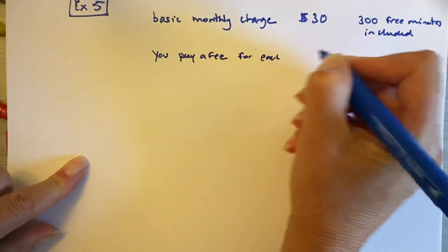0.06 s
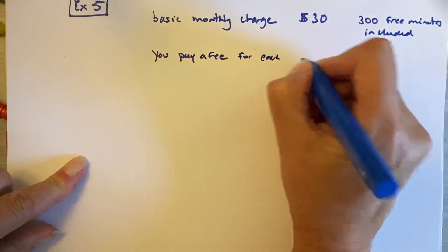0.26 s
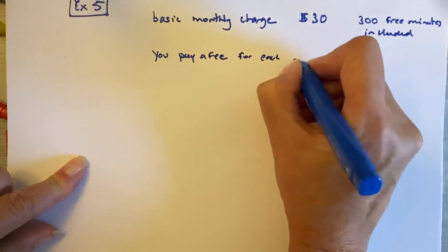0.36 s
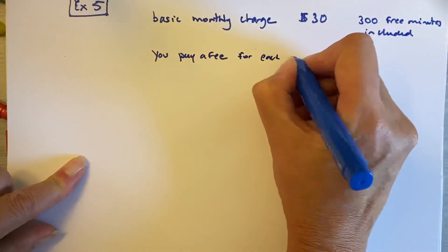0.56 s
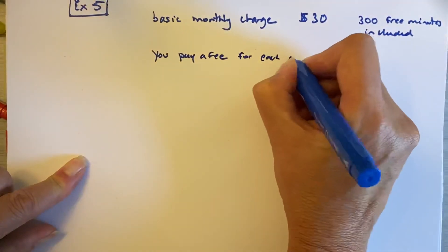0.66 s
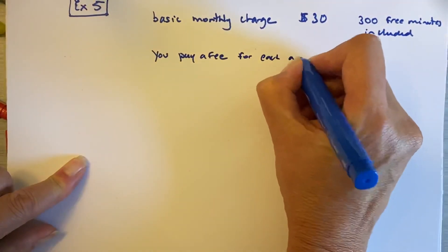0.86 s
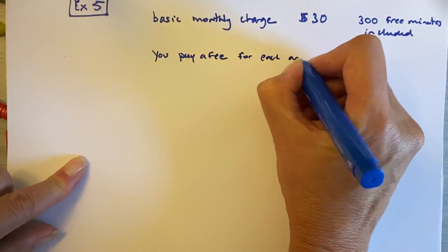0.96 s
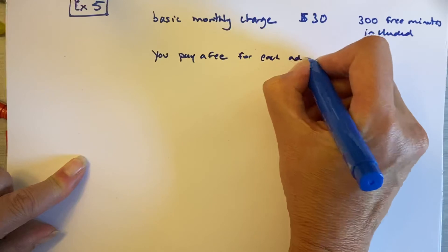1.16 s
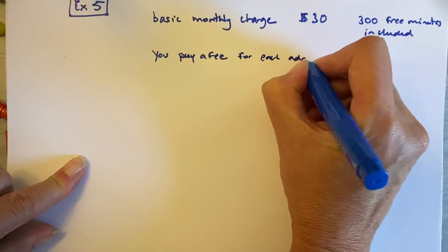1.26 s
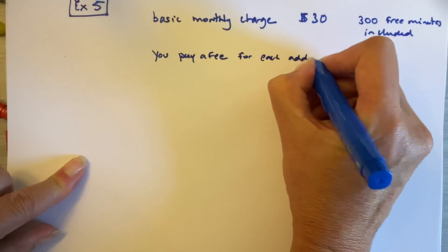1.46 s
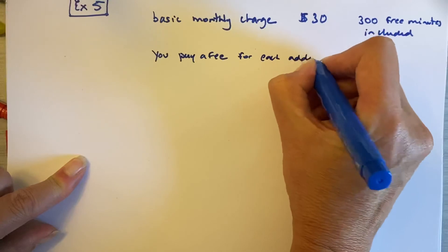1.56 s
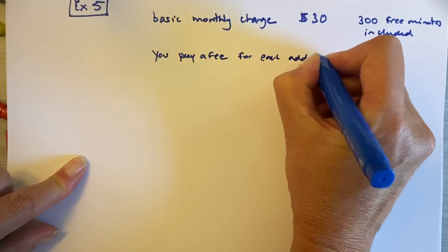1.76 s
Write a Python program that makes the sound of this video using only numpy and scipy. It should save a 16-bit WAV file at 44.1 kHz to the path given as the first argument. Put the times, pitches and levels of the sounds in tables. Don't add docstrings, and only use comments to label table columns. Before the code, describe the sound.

A felt-tip marker writes on paper on a wooden desk: hollow hand thumps and a brief slide come first, then quick dry scratches with soft taps, close microphone, quiet room with low rumble.

```python
import sys
import numpy as np
from scipy import signal
from scipy.fft import rfft, irfft
from scipy.io import wavfile
from scipy.ndimage import uniform_filter1d

SR = 44100
rng = np.random.default_rng(int(sys.argv[2]) if len(sys.argv) > 2 else 0)


def voltage_ratio(decibels):
    exponent = np.asarray(decibels, float) / 20
    return 10 ** exponent


def wav_out(sig):
    wavfile.write(sys.argv[1], SR, np.round(np.clip(np.atleast_2d(sig).T, -1, 1) * 32767).astype(np.int16))


N = 79380
T = np.arange(N) / SR
F = np.arange(N // 2 + 1) * SR / N

# (frequency [Hz], density [dB])
ROOM_SPECTRUM = [(15, -11.5), (25, -16), (50, 3), (114, 6), (1100, -29), (1410, -30.5), (2190, -34.5),
                 (2340, -24.5), (2510, -35.5), (6000, -55.5), (7800, -38), (13200, -120)]
# (frequency [Hz], lead [rad])
PORT_LEAD = [(0, 0), (160, -.2), (1000, -.36), (1400, -.36), (2500, .56), (3300, .17), (4300, .8),
             (5000, .13), (6950, 3.0), (7350, 3.14), (8000, 3.45), (9750, 6.03), (11500, 6.6), (12500, 9.3),
             (13700, 9.5), (14900, 11.8), (15600, 12.4)]
# (start [s], length [s], level [dB])
SLIDES = [
    (.19, 0.058, -67),
    (.243, 0.063, -67.5),
    (.322, 0.06, -68.5),
    (.375, 0.036, -78),
]
# (frequency [Hz], width [Hz], level [dB])
SKIN = [(467, 173, 20), (1380, 300, 3), (2130, 110, 3), (2470, 370, -0.5), (3830, 1000, -7.5),
        (6200, 200, 7.5), (8670, 800, -52)]
# (time [s], level [dB], push [ms], crack [dB])
THUMPS = [
    (.062, -39, 5.9, -66),
    (.1925, -62.5, 1.6, -2),
    (.213, -28, 6.1, -55),
    (.2465, -41.5, 2.67, -18.5),
    (.282, -29, 7.5, -47),
    (.3195, -40, 0.7, -15.5),
    (.3252, -27.5, 2.16, -29.5),
    (.425, -38, 2.52, -52),
    (.622, -35, 7.1, -52),
]
# (frequency [Hz], level [dB], t60 [s])
DESK_FREE = [(118.4, -17, 1), (163.1, 0.5, 0.37), (245.9, 5, 0.23), (329, -1, 0.065), (407, 2, 0.026),
             (491, -4, 0.061), (660, -4.5, 0.023), (675, -11, 0.21), (733, -9.5, 0.066), (864, -31, 0.04),
             (1027, -18, 0.24), (1250, -35.5, .12), (1666, -19, 0.12), (2150, -30, .12)]
# (time [s], level [dB], push [ms], crack [dB])
TAPS = [(.522, -68.5, 1, -2), (.592, -47.5, 1.38, -35), (.849, -42.5, 5.7, -13), (.878, -83, 0.56, -35),
        (1.000, -43, 2.38, -30), (1.058, -39, 5.3, -24), (1.108, -75, 6.6, -36), (1.252, -52, 3.7, -8),
        (1.435, -42.5, 2.37, -42), (1.561, -66, 1.1, -4), (1.568, -47, 2.38, -28), (1.743, -83, 1.8, 5),
        (1.765, -70.5, 5.8, 2)]
# (frequency [Hz], level [dB], t60 [s])
DESK_PRESSED = [(57.3, -20, 0.37), (111, -13.5, 0.13), (202, -14, 0.068), (267, -7, 0.054),
                (321.4, 1, 0.059), (412.5, -20, 0.17), (491, -26, 0.24)]
# (frequency [Hz], density [dB])
CRACK_SPECTRUM = [(600, -12), (2000, 1), (4500, -12), (6200, 2.5), (9000, -11), (15500, -52)]
# (start [s], length [s], level [dB], pitch [Hz], glide [Hz/s])
CHATTER = [(-.02, 0.055, -63.5, 321.8, 1), (0.234, 0.015, -44.5, 407, 16), (0.421, 0.022, -50.5, 332.4, 1),
           (0.423, 0.027, -60, 438, 6), (.43, .04, -54, 249.3, 3), (0.56, .03, -53.5, 309.4, -3),
           (.583, 0.018, -49, 407.5, 4), (.585, 0.022, -61, 521, -3), (.625, 0.029, -61.5, 510.3, -10),
           (1.147, 0.029, -62.5, 330, 0), (0.603, 0.15, -57, 334.3, -300), (0.758, 0.059, -52.5, 309, 8),
           (0.858, 0.05, -52, 315.5, -100), (0.909, 0.035, -50.5, 317.8, -250),
           (0.943, 0.051, -64, 422, -4), (0.986, 0.027, -54, 297.7, 250), (.715, 0.038, -55.5, 269, -5),
           (1.056, 0.084, -53, 306.1, 252), (1.094, 0.065, -59.5, 431, 12), (1.187, 0.058, -54.5, 316, 197),
           (1.245, 0.052, -53, 305.3, 253), (1.29, 0.034, -60.5, 260.4, 4), (1.253, 0.045, -61, 424, 4),
           (1.373, 0.11, -66, 313, -8), (1.429, 0.03, -44.5, 314.6, 0), (1.438, 0.052, -59, 126.3, -6),
           (1.475, .025, -62.5, 295, 0), (1.565, .022, -55.5, 314, -16), (1.575, 0.026, -56.5, 123, 0),
           (1.784, 0.023, -59.5, 291, 0)]
# (start [s], length [s], scratch [dB], barrel re scratch [dB], desk hum [dB])
STROKES = [(-.02, 0.11, -67, -19.5, -62.5), (.133, 0.053, -65.5, -33, -64), (.189, 0.022, -62, -19, -43),
           (.519, 0.06, -67, -4, -61), (.568, 0.05, -63, -17, -53), (.624, .02, -75.5, -1, -66),
           (.642, 0.038, -57.5, -19, -54), (.703, 0.016, -68, -5, -66), (.714, 0.083, -62, -8, -64),
           (.795, 0.062, -63, -9.5, -61), (.844, 0.075, -61, -13, -59.5), (.922, 0.014, -67.5, 2, -62),
           (.932, 0.042, -57.5, -15, -58.5), (.975, .035, -66.5, -5.5, -62.5),
           (1.026, 0.017, -63, -12, -60), (1.044, 0.077, -58, -7, -56), (1.152, 0.0097, -66, -9, -64),
           (1.163, 0.061, -61.5, -13.5, -57.5), (1.232, 0.014, -66, -4, -67), (1.243, 0.035, -62, -15, -60),
           (1.346, 0.014, -64.5, -16, -67), (1.358, 0.054, -60, -5.5, -59),
           (1.412, 0.031, -59.5, -11, -50.5), (1.505, 0.05, -67.5, -15, -63.5),
           (1.776, 0.097, -58.5, -11.5, -80)]
# (frequency [Hz], density [dB])
PAPER = [(600, -53), (1000, -35), (2400, -11.5), (4400, 9), (6300, -4), (8500, 6), (11500, -9.5),
         (15500, -57)]
# (frequency [Hz], width [Hz], level [dB])
TIP = [(2940, 65, 8), (3410, 67, -6.5), (4080, 94, -12.5), (4180, 220, -7), (4546, 140, 6.5),
       (5580, 1500, -14.5), (7030, 300, 9), (7530, 1200, 8), (8340, 610, 3.5), (10700, 250, 1)]
# (frequency [Hz], width [Hz], level [dB])
BARREL = [(1446, 29, 8), (1749, 50, 14.5), (1810, 360, 8), (1010, 90, 6)]

ROOM_DB, ROOM_SIDE_DB = -64.5, -22
WHINE_HZ, WHINE_DB, WHINE_FROM_S = 2360, -90, 1.5
HISS_HZ, HISS_WIDTH_HZ, HISS_DB, AIR_DB = 7350, 450, -78.5, -105
CRACK_T60_S, CRACK_LOW_CUT_HZ, KNOCK_LOW_CUT_HZ = 0.025, 910, 105
MUTED_S, MUTE_DB_PER_S = 0.4156, 375.5
RISE_S, FALL_S, SWELL_DB = 0.009, 0.022, 5.0
CHATTER_WOBBLE, CHATTER_ROUGH_DB = 0.0339, 0
HUM_LAG_S = 0.017
GRAIN_DB, FLICKER_DB, PATCHY_DB = 2, 0.8, 2.6
TIP_DB, SCRATCH_DB = 5, -0.5
ECHO_DB, ECHO_T60_S, ECHO_LOW_HZ, ECHO_HIGH_HZ = -12, 0.24, 515, 5940
TILT_DB, TOP_HZ = 0.1, 15700


def unit(x):
    return x / np.sqrt(np.mean(x ** 2))


def colour(x, spectrum):
    hz, db = np.array(spectrum).T
    return irfft(rfft(x) * voltage_ratio(np.interp(np.log(F + 1), np.log(hz), db)), N)


def ring(x, modes):
    out = 0
    for hz, db, t60_s in modes:
        pole = np.exp(2j * np.pi * hz / SR - np.log(1000) / (t60_s * SR))
        out = out + voltage_ratio(db) * signal.lfilter([1], [1, -pole], x).imag
    return out


def peaks(x, resonances):
    modes = [(hz, db + 20 * np.log10(width_hz / 100), np.log(1000) / np.pi / width_hz)
             for hz, width_hz, db in resonances]
    return ring(x, modes)


def walk(rate_hz):
    hold = int(SR / rate_hz)
    steps = np.repeat(rng.standard_normal(N // hold + 1), hold)
    return 1.043 * uniform_filter1d(uniform_filter1d(steps, hold), hold)[:N]


def motion(rows, db_of, lag_s=0):
    total = 0
    for row in rows:
        length_s = row[1]
        since_s = T - lag_s - row[0]
        swell = np.sin(np.pi * np.clip(since_s / length_s, 0, 1)) - 1
        edges = np.minimum(since_s / RISE_S, (length_s - since_s) / FALL_S + 1)
        total = total + voltage_ratio(db_of(row) + SWELL_DB * swell) * np.clip(edges, 0, 1) ** 2
    return total


def room():
    spectrum = ROOM_SPECTRUM + [(9000, ROOM_SPECTRUM[-1][1] - 10)]
    mid = unit(colour(rng.standard_normal(N), spectrum))
    side = unit(colour(rng.standard_normal(N), spectrum))
    rumble = mid + voltage_ratio(ROOM_SIDE_DB) * side * np.array([[1], [-1]])
    whine = voltage_ratio(WHINE_DB) * np.sin(2 * np.pi * WHINE_HZ * T)
    whine = whine * np.clip((T - WHINE_FROM_S) / 0.057, 0.2, 1)
    return voltage_ratio(ROOM_DB + 0.25 * walk(10.0)) * rumble + whine


def hiss():
    band = unit(peaks(rng.standard_normal(N), [(HISS_HZ, HISS_WIDTH_HZ, 0)]))
    return voltage_ratio(HISS_DB) * band + voltage_ratio(AIR_DB) * rng.standard_normal(N)


def hand_slides():
    return unit(peaks(rng.standard_normal(N), SKIN)) * motion(SLIDES, lambda row: row[2] + 8)


def knocks(rows, modes):
    push, crack = np.zeros(N), np.zeros(N)
    for start_s, db, push_ms, crack_db in rows:
        phase = np.pi * np.clip((T - start_s) / push_ms * 1000, 0, 1)
        push += voltage_ratio(db) * np.sin(phase) ** 2 / (push_ms * SR / 2000)
        decay = np.exp(-np.log(1000) * np.abs(T - start_s) / CRACK_T60_S)
        crack += voltage_ratio(db + crack_db) * (T > start_s) * decay
    low_cut = signal.butter(4, KNOCK_LOW_CUT_HZ, "high", fs=SR, output="sos")
    thud = signal.sosfilt(low_cut, ring(push, modes))
    b, a = signal.butter(1, CRACK_LOW_CUT_HZ, "high", fs=SR)
    noise = signal.lfilter(b, a, crack * rng.standard_normal(N))
    return thud + 3 * colour(noise, CRACK_SPECTRUM)


def hand_thumps():
    mute = voltage_ratio(-MUTE_DB_PER_S * np.maximum(T - MUTED_S, 0))
    return knocks(THUMPS[:-1], DESK_FREE) * mute + knocks(THUMPS[-1:], DESK_FREE)


def pen_taps():
    return knocks(TAPS, DESK_PRESSED)


def chatter():
    wobble_s = CHATTER_WOBBLE * np.cumsum(walk(45.08)) / SR
    total = 0
    for row in CHATTER:
        start_s, _, _, pitch_hz, glide_hz_per_s = row
        since_s = T - start_s
        cycles = pitch_hz * (since_s + wobble_s) + glide_hz_per_s * since_s ** 2 / 2
        level = uniform_filter1d(motion([row], lambda r: r[2]), size=400)
        total = total + np.sin(2 * np.pi * cycles) * level
    return np.sqrt(2) * voltage_ratio(CHATTER_ROUGH_DB * walk(40.9)) * total


def desk_hum():
    band = signal.butter(2, [40, 480], "band", fs=SR, output="sos")
    hum = signal.sosfilt(band, ring(rng.standard_normal(N), DESK_PRESSED))
    hum = hum / np.sqrt(uniform_filter1d(hum ** 2, size=1600))
    return hum * uniform_filter1d(motion(STROKES, lambda row: row[4], HUM_LAG_S), size=900)


def patchy(x):
    spectrum = rfft(x)
    band = 2 * np.log2((F + 1) / 500)
    total = 0
    for k in range(11):
        part = irfft(spectrum * np.clip(1 - np.abs(band - k), 0, 1), N)
        total = total + part * voltage_ratio(PATCHY_DB * walk(15.54))
    return total


def marker():
    grain = np.repeat(rng.exponential(size=N // 8 + 1), 8)[:N]
    catch_db = GRAIN_DB * grain + FLICKER_DB * walk(60.5)
    catches = patchy(rng.standard_normal(N) * voltage_ratio(catch_db))
    scratch = unit(unit(colour(catches, PAPER)) + voltage_ratio(TIP_DB) * unit(peaks(catches, TIP)))
    scratch = scratch * motion(STROKES, lambda row: row[2])
    barrel = unit(peaks(catches, BARREL)) * motion(STROKES, lambda row: row[2] + row[3])
    return voltage_ratio(SCRATCH_DB) * (scratch + barrel)


def room_tail(near):
    t = T[:SR // 2]
    tails = rng.standard_normal((2, len(t))) * np.exp(-np.log(1000) * t / ECHO_T60_S) * (t > 0.004)
    tails[1] = 0.85 * tails[0] + 0.45 * tails[1]
    b, a = signal.butter(2, [ECHO_LOW_HZ, ECHO_HIGH_HZ], "band", fs=SR)
    tails = signal.lfilter(b, a, tails)
    return np.array([signal.fftconvolve(near, tail / np.sqrt(np.sum(tail ** 2)))[:N] for tail in tails])


def ports(x):
    hz, lead_rad = np.array(PORT_LEAD).T
    turn = np.exp(0.5j * np.interp(F, hz, lead_rad))
    left = voltage_ratio(TILT_DB) * irfft(rfft(x[0]) * turn, N)
    right = irfft(rfft(x[1]) / turn, N)
    return np.array([left, right])


def scene():
    near = hiss() + hand_slides() + hand_thumps() + pen_taps() + chatter() + desk_hum() + marker()
    return ports(near + voltage_ratio(ECHO_DB) * room_tail(near) + room())


def band_limit(x):
    return signal.sosfilt(signal.butter(12, 16070, fs=SR, output="sos"), x)


def record(dry):
    top_cut = signal.ellip(8, 0.2, 60, TOP_HZ, fs=SR, output="sos")
    mix = signal.sosfilt(top_cut, dry)
    return band_limit(mix)


dry = scene()
out = record(dry)
wav_out(out)
```